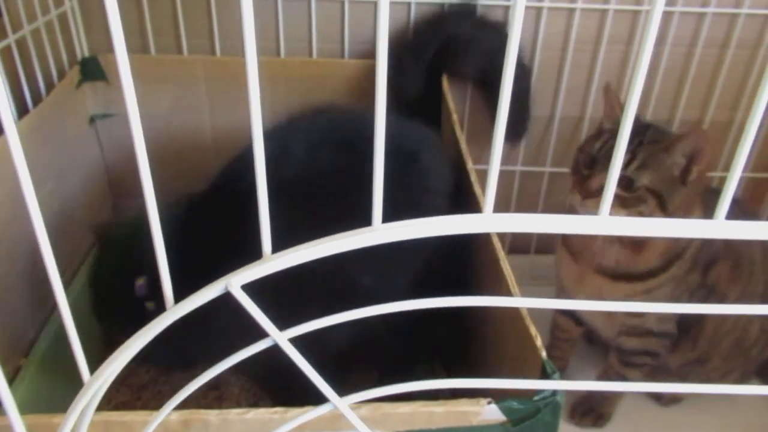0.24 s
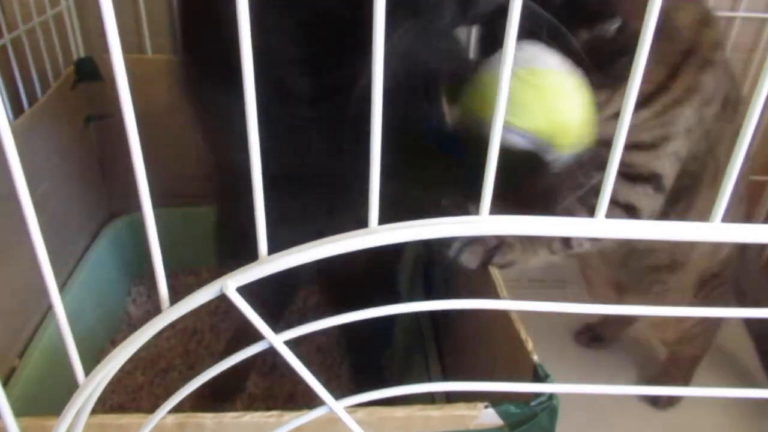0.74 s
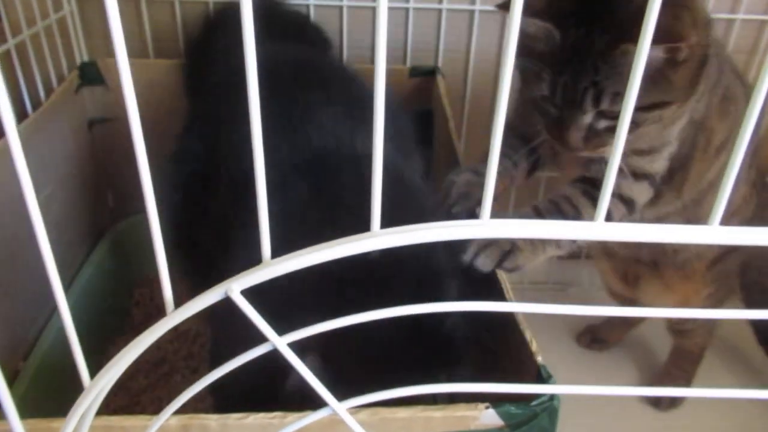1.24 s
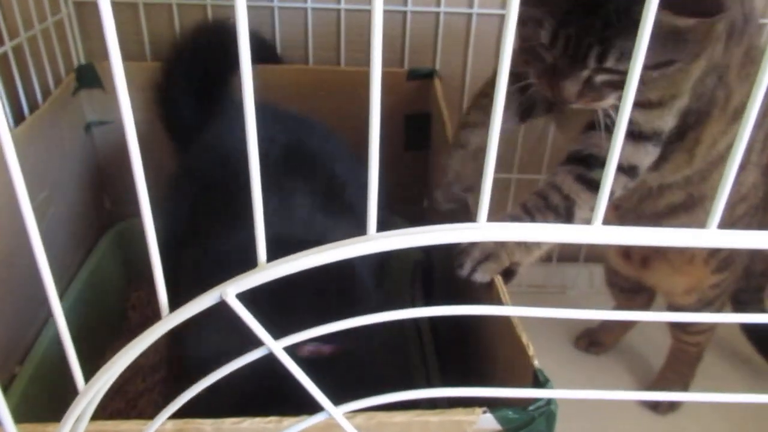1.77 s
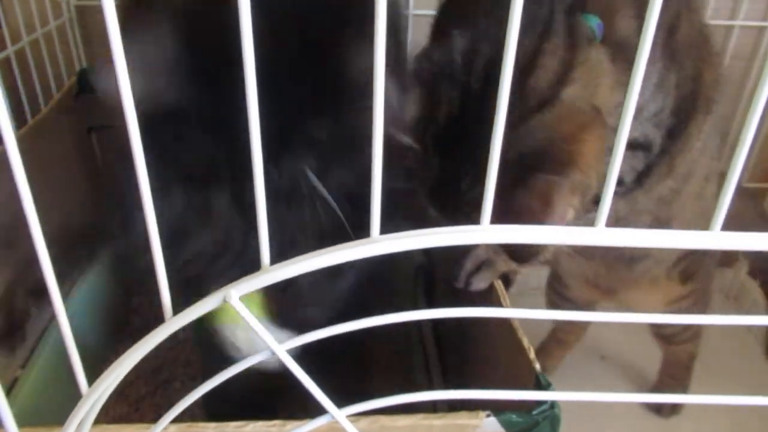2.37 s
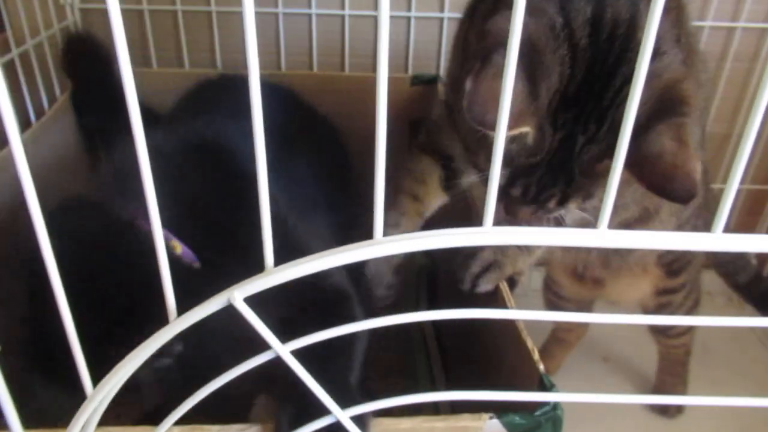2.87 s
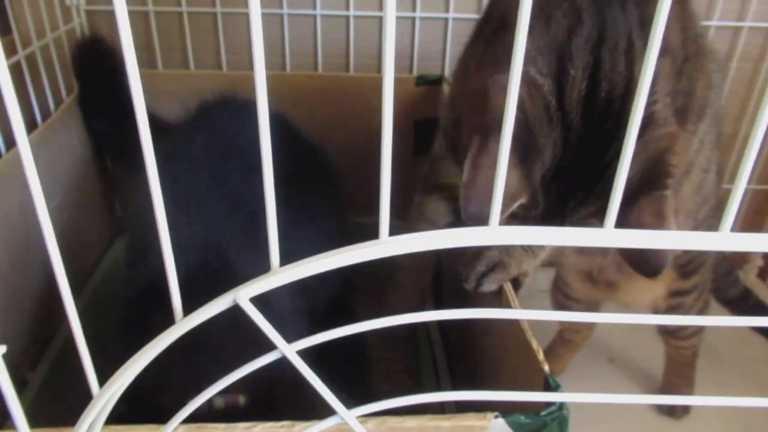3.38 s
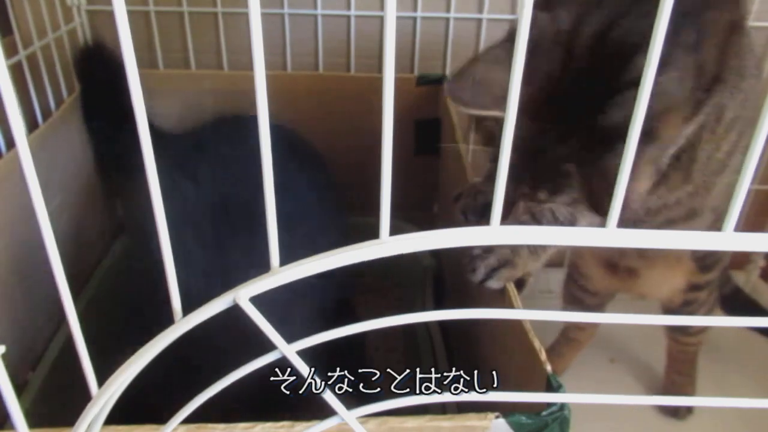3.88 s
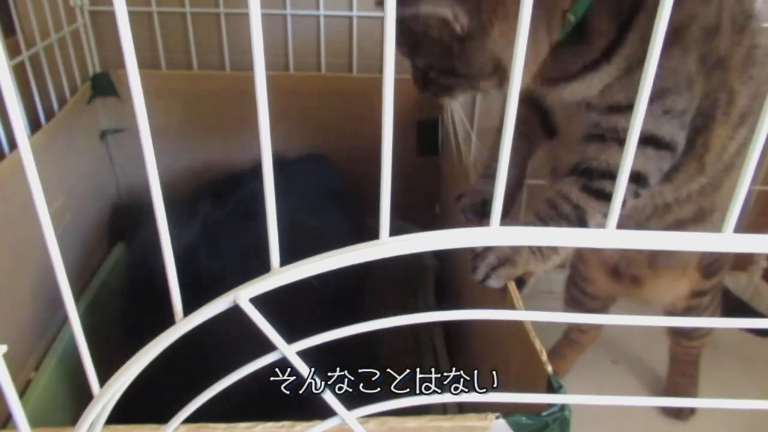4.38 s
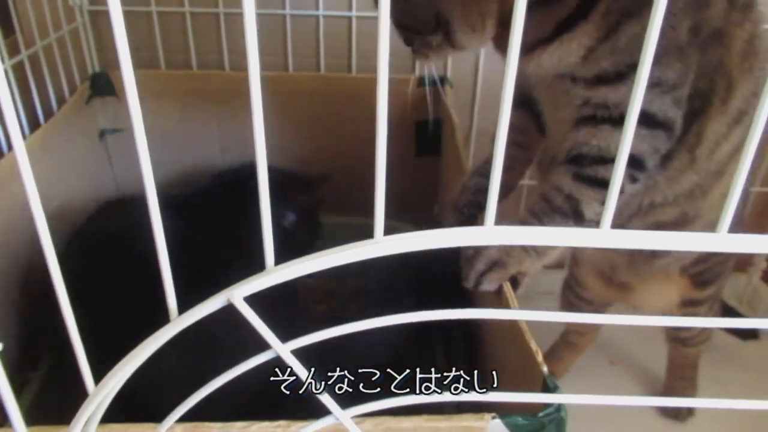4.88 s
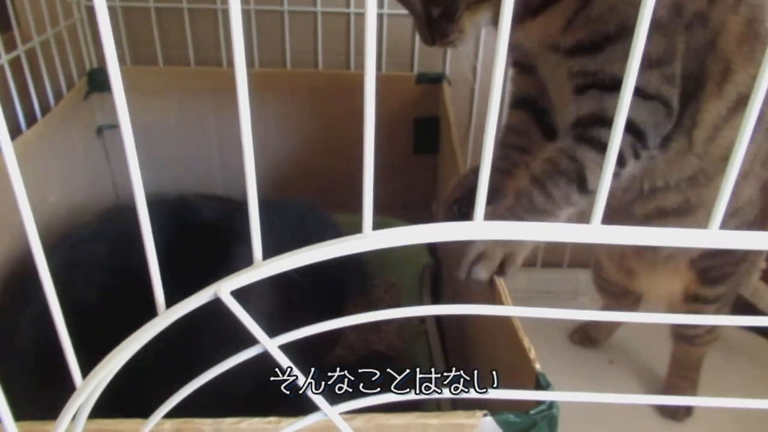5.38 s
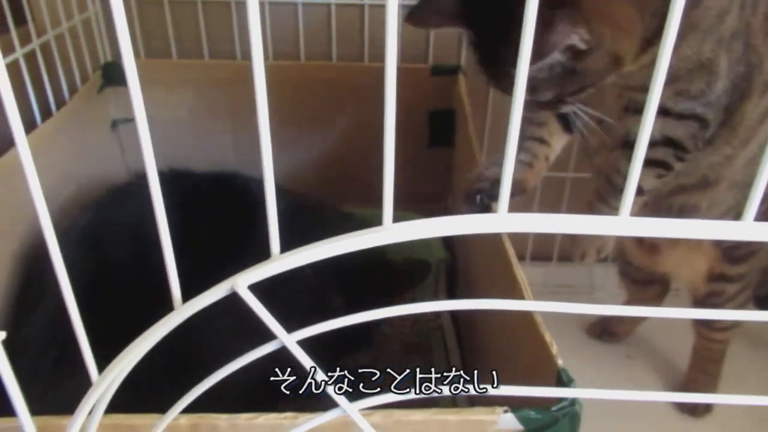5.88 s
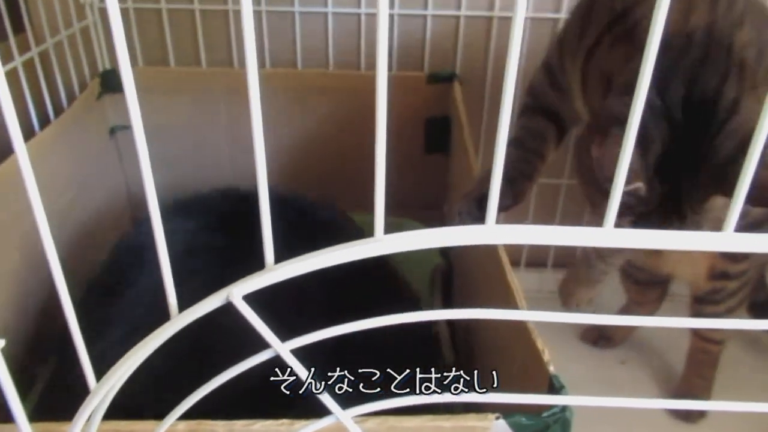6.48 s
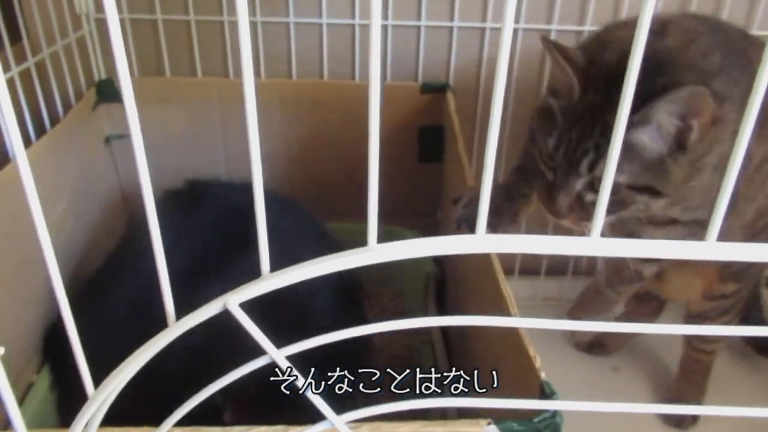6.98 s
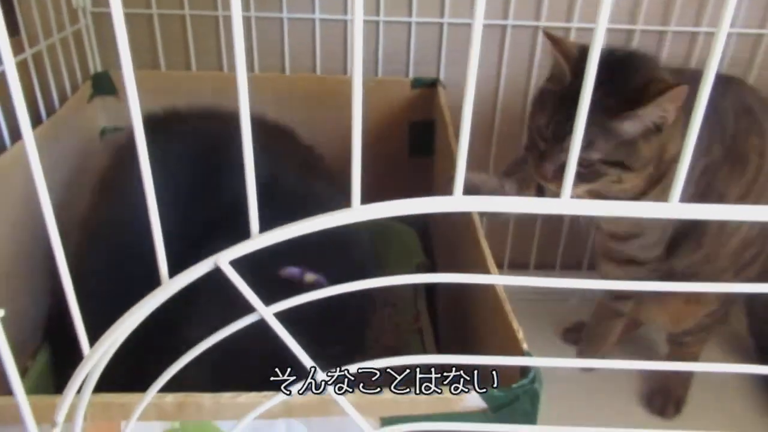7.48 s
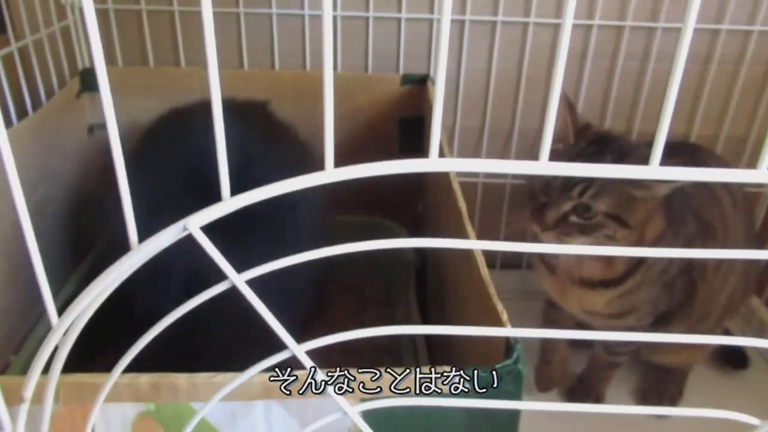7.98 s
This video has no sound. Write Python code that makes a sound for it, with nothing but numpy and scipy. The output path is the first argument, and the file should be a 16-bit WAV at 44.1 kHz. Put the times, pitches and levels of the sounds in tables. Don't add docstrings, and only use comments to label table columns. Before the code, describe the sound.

A kitten digs in wood pellets in a plastic tray, sharp crunchy cracks and rustling bursts between quiet pauses of room hiss.

```python
import sys
import numpy as np
from scipy import signal
from scipy.fft import rfft, irfft, next_fast_len
from scipy.io import wavfile
from scipy.ndimage import uniform_filter1d

SR = 44100
rng = np.random.default_rng(int(sys.argv[2]) if len(sys.argv) > 2 else 0)


def level_to_linear(level):
    exponent = np.asarray(level, float) / 20
    return 10 ** exponent


def bounce(signal):
    frames = np.transpose(np.atleast_2d(signal))
    limited = np.clip(frames, -1, 1)
    pcm = np.round(limited * 32767).astype(np.int16)
    wavfile.write(sys.argv[1], SR, pcm)


N = 363384


def evened(x):
    return x / np.sqrt(np.mean(x ** 2) + 1e-20)


def read(points, hz):
    f, value = np.transpose(points)
    return np.interp(np.log(hz + 1), np.log(f + 1), value)


def add(mix, s, sound):
    part = mix[round(s * SR):][:len(sound)]
    part += sound[:len(part)]


def colour(x, points):
    size = next_fast_len(len(x))
    gain = level_to_linear(read(points, np.fft.rfftfreq(size, 1 / SR)))
    return irfft(rfft(x, size) * gain, size)[:len(x)]


def resonate(x, hz, width_hz):
    turn = np.exp(2j * np.pi * np.cumsum(hz * np.ones(len(x))) / SR)
    r = np.exp(-np.pi * width_hz / SR)
    return 2 * (turn * signal.lfilter([1 - r], [1, -r], x / turn)).real


def band(x, lo_hz, hi_hz):
    y = signal.sosfilt(signal.butter(2, [lo_hz, hi_hz], "band", fs=SR, output="sos"), x)
    return y / np.abs(y).max()


def clicks(per_s, spread_db):
    size = level_to_linear(spread_db * np.minimum(rng.exponential(1, N), 4)) * rng.choice([-1., 1.], N)
    return evened(size * (rng.random(N) < per_s / SR))


def room_hiss():
    # hz, level_db_per_hz
    air_spectrum = [(13, -43), (22, -25), (84, -6.5), (138, -9.5), (168, -17.5), (282, -8), (382, -14),
                    (438, -12), (475, -17.5), (1420, -21), (1770, -20.5), (2270, -28), (10800, -35.5),
                    (15500, -41.5)]
    level_db = -54
    frames, hz = N // 512 + 5, np.fft.rfftfreq(2048, 1 / SR)
    a, b, patches = rng.standard_normal((frames, 1025, 3)).T
    patches_db = evened(uniform_filter1d(uniform_filter1d(patches, 20, 0), 8, 1))
    z = (a + 1j * b) * level_to_linear(read(air_spectrum, hz)[:, None] + patches_db)
    return level_to_linear(level_db) * evened(signal.istft(z, nperseg=2048, noverlap=1536)[1][:N])


def hum():
    # time_s, pitch_hz, level_db, half_tone_db
    hum_track = [(0, 89.2, -74.5, -64), (2.75, 85.9, -59, -65), (3.35, 80, -56.5, -64),
                 (3.85, 68.7, -56, -69), (4.199, 83.5, -81, -78), (5.6, 84.6, -69, -59.5),
                 (5.899, 83.5, -58.5, -59), (6.5, 87.3, -55, -62), (6.9, 83.8, -59, -70),
                 (7.498, 83.5, -57.5, -62), (8.24, 87, -70, -66)]
    s, *columns = np.transpose(hum_track)
    hum_hz, hum_db, half_db = (np.interp(np.arange(N) / SR, s, c) for c in columns)
    waver = evened(uniform_filter1d(uniform_filter1d(rng.standard_normal(N), size=4000), size=4000))
    phase = 2 * np.pi * np.cumsum(hum_hz + 1.2 * waver) / SR
    tone = np.sqrt(2) * level_to_linear(hum_db + 0.68 * waver) * np.sin(phase)
    half = resonate(resonate(rng.standard_normal(N), hum_hz / 2, 7.3), hum_hz / 2, 7.8)
    whine = level_to_linear(-73) * evened(resonate(rng.standard_normal(N), 1800, 12))
    return tone + level_to_linear(half_db) * evened(half) + whine


def squeaks():
    # start_s, length_s, top_hz, end_droop_hz, level_db
    whistles = [
        (.235, .2, 13450, 1900, -76),
        (2.6, .18, 13100, 1700, -76),
        (6.37, .12, 13600, 1100, -77),
        (6.485, .075, 13350, 700, -78),
    ]
    lean = .75
    out = np.zeros(N)
    for s, length_s, top_hz, droop_hz, db in whistles:
        arch = np.sin(np.pi * np.linspace(0, 1, int(length_s * SR)) ** lean)
        hz = top_hz - droop_hz * (1 - arch)
        tone = np.sin(2 * np.pi * np.cumsum(hz) / SR)
        add(out, s, np.sqrt(2) * level_to_linear(db) * np.sqrt(abs(arch)) * tone)
    return out


def swishes():
    # start_s, length_s, level_db
    brushes = [(1.455, 0.067, -59.5), (1.568, 0.079, -53), (7.63, 0.096, -59), (2.07, 0.18, -58.5),
               (3.857, 0.25, -57.5), (5.32, 0.089, -62), (5.69, 0.23, -61), (7.517, 0.076, -58.5),
               (8.102, 0.083, -53)]
    level, hiss = np.zeros(N), evened(band(rng.standard_normal(N), 2300, 11800))
    for s, length_s, db in brushes:
        add(level, s, level_to_linear(db) * np.hanning(int(length_s * SR)))
    return level * hiss


def struck_wall(blows):
    puff_hz = 900
    out, t = np.zeros(N), np.arange(12000) / SR
    draws = rng.standard_normal((len(blows), len(t)))
    for (s, db, hz, t60_s), noise in zip(blows, draws):
        shape = level_to_linear(-60 * t / max(t60_s, .02)) * np.minimum(t * hz / 0.44, 1)
        swing = np.sin(2 * np.pi * hz * t) * shape
        puff = np.clip(hz / puff_hz, .3, 1.1) * band(noise * shape, 0.69 * hz, 2.36 * hz)
        add(out, s, level_to_linear(db + 2.5) * (swing + puff))
    return out


def thumps():
    # start_s, peak_db, pitch_hz, t60_s
    paw_thumps = [(0.24, -36, 155, 0.03), (0.662, -34, 65.5, 0.11), (0.673, -34.5, 287, 0.097),
                  (0.804, -25.5, 214, 0.033), (0.841, -39, 89.5, 0.15), (.845, -29.5, 230, 0.053),
                  (1.502, -29.5, 78, 0.075), (.53, -36.5, 300, .04), (.755, -36, 250, .05),
                  (4.82, -37, 324, 0.069), (4.68, -40, 278, 0.059), (1.616, -41.5, 287, 0.18),
                  (2.087, -37.5, 392, 0.12), (2.088, -39.5, 697, 0.11), (2.217, -42, 413, 0.039),
                  (2.29, -40, 388, 0.025), (2.115, -33, 84, 0.097), (2.509, -27, 458, 0.047),
                  (2.516, -20, 59.6, 0.05), (2.537, -34, 41, 0.3), (2.62, -26.5, 151, 0.064),
                  (2.66, -38, 72, 0.18), (2.633, -40, 45, 0.13), (3.179, -33.5, 300, 0.046),
                  (4.035, -24, 96, 0.11), (4.211, -47, 44.5, 0.19), (4.737, -33.5, 113, 0.044),
                  (5.326, -44.5, 146, 0.086), (5.332, -41, 532, 0.072), (6.792, -45.5, 246.4, 0.42),
                  (6.85, -42.5, 292, 0.2), (7.95, -42.5, 263, 0.16)]
    return struck_wall(paw_thumps)


def knocks():
    # start_s, peak_db, pitch_hz, t60_s
    tray_knocks = [(3.199, -33.5, 950, 0.039), (3.197, -31, 472, 0.057), (4.96, -27.5, 560, 0.08),
                   (.701, -32, 4300, 0.017), (2.67, -35, 290, 0.086), (4.093, -12.5, 910, 0.017),
                   (4.23, -31.5, 283, 0.096), (4.2725, -15, 665, 0.033), (1.621, -25.5, 2350, 0.054),
                   (4.822, -27.5, 2280, 0.032), (6.9, -34, 876, 0.029), (.7, -25, 1340, .03),
                   (.927, -31, 1450, .04), (.93, -39, 2580, .03), (.862, -32, 2470, 0.034),
                   (1.621, -28.5, 1200, 0.029), (2.684, -37, 2500, .02), (2.712, -40, 2500, .02),
                   (2.91, -29.5, 1290, 0.031), (4.729, -32, 1350, 0.031), (4.823, -26.5, 800, 0.054),
                   (4.212, -26, 1260, .04), (0.48, -46, 1080, 0.046), (2.617, -36, 1130, .03),
                   (.812, -27, 1570, .04), (0.91, -33, 3100, .02), (2.615, -34, 4000, 0.022),
                   (4.04, -35.5, 277, 0.086), (2.512, -31, 286, 0.062)]
    return struck_wall(tray_knocks)


def rustle():
    # time_s, level_db
    stir = [(0.0, -52), (0.6, -49), (0.8, -37.5), (1.05, -47.5), (1.99, -61), (2.81, -47), (3.29, -59),
            (4.0, -51.5), (4.23, -38.5), (4.95, -44.5), (5.17, -56), (5.78, -55), (6.41, -54), (6.73, -47),
            (7.0, -57.5), (7.62, -49), (7.87, -41.5), (8.22, -46.5)]
    # start_s, length_s, tray_body_db, grit_rel_db
    scrapes = [(3.966, 0.12, -49.5, -16), (5.708, 0.14, -58, -6), (7.896, 0.065, -52, -29),
               (8.139, 0.034, -48.5, -8), (0.148, 0.057, -38, -16), (0.228, 0.035, -41, -30),
               (0.424, 0.043, -55, -24), (0.577, 0.028, -45, -30), (0.601, 0.035, -40.5, -28),
               (0.65, 0.046, -45.5, -10), (0.804, 0.071, -36.5, -19), (2.666, 0.067, -37, -24),
               (3.155, 0.071, -46.5, 1), (4.952, 0.025, -45, -3), (4.102, 0.021, -39, 12),
               (7.962, 0.12, -59.5, -4), (5.5, 0.014, -37.5, -28), (6.494, 0.064, -43, -13),
               (6.825, 0.11, -39, -14.5), (7.716, 0.097, -38.5, -12.5), (7.946, 0.018, -33, -6),
               (4.061, 0.067, -38, -14), (4.147, 0.047, -49, -10), (4.21, 0.072, -37, -16),
               (4.3, 0.044, -47, -10), (4.367, 0.098, -46, -10), (4.47, 0.078, -51.5, -14),
               (4.557, 0.084, -44.5, -12), (4.661, 0.035, -44, -18), (4.712, .07, -45, -15),
               (4.823, 0.065, -43, -14), (4.966, 0.082, -43, -14), (5.078, 0.038, -47, -16),
               (6.582, 0.038, -44, -13), (6.656, 0.027, -44, -13), (8.17, 0.066, -39, -18)]
    # hz, level_db_per_hz
    body_spectrum = [(200, -5), (480, -4), (600, 3.5), (1270, -5.5), (2500, -12), (4000, -25), (8000, -50)]
    # hz, level_db
    grit_spectrum = [(1200, -40), (2500, 10), (4000, -2.5), (7000, 1.5), (11000, -8), (15000, -16)]
    # pitch_hz, width_hz, level_db
    tray_modes = [(660, 30, -9), (875, 38, 16.5), (1156, 60, 24), (1650, 140, 30.5), (2480, 520, -17),
                  (3270, 98, 19)]
    grit_rest_db, grit_knee_db, grit_rise = -62.5, -43, 3
    stir_db = np.interp(np.arange(N) / SR, *np.transpose(stir))
    grit_db = grit_rest_db + grit_rise * np.maximum(stir_db - grit_knee_db, 0)
    body_level, grit_level = level_to_linear(stir_db - 5.5), level_to_linear(grit_db - 4.5)
    for s, length_s, db, rel_db in scrapes:
        stroke = np.sin(np.linspace(0, np.pi, int(length_s * SR))) ** 0.79
        add(body_level, s, level_to_linear(db) * stroke)
        add(grit_level, s, level_to_linear(db + rel_db) * stroke ** 2)
    taps = clicks(1800, 2.0)
    rings = np.zeros(N)
    for k, (hz, width_hz, db) in enumerate(tray_modes):
        rings += (-1) ** k * level_to_linear(db) * resonate(taps, hz, width_hz)
    body = evened(evened(colour(taps, body_spectrum)) + 0.39 * evened(rings))
    grit = evened(colour(clicks(1500, 2.4), grit_spectrum))
    return body_level * body + grit_level * grit


def cracks():
    # start_s, peak_db, tray_body_rel_db, sparkle_rel_db
    step_cracks = [(0.0828, -42, 0, -53), (0.1465, -26.5, 0, -7), (0.1744, -34.5, 3, -21),
                   (0.2017, -23, -5.5, -39), (0.218, -39, 0, -45), (0.238, -35.5, 4, -36),
                   (0.4403, -51.5, 14, -7), (0.5907, -48.5, 7, -12), (0.6997, -21.5, -49, -12),
                   (0.712, -29, -12, -41), (0.8054, -36, -4, -40), (0.8099, -19, -9, -14),
                   (0.8229, -22, -23, -31), (0.8374, -27, -11, -17), (0.8612, -15, -42, -10.5),
                   (0.9255, -18.5, -39, -24), (0.9333, -20.5, -29, -28), (1.6202, -13, -12.5, -12),
                   (1.641, -25, -13, -28), (2.5086, -21, -1.5, -4), (2.5305, -26, -6, -11),
                   (2.614, -23.5, -2.5, -8), (2.6694, -40, -12, -20), (2.684, -41, -12, -20),
                   (2.7112, -40, -6, -29), (2.7591, -38, 3.5, -10.5), (2.771, -39.5, 2, -10),
                   (2.9019, -32, -10, -16), (2.9098, -22, -7.5, -8), (3.1992, -35, 10.5, -2.5)]
    dig_cracks = [(3.8394, -48, -10, -0.5), (4.0397, -30.5, 2.5, -22), (4.0557, -12.5, -7.5, -6),
                  (4.0694, -18.5, -1, -20), (4.0826, -9.5, -5, -18), (4.0926, -6.5, -8, -14),
                  (4.107, -19, -8, -8), (4.1485, -24, -29, -19), (4.1564, -20, -20, -14),
                  (4.2108, -16.5, 3, -16), (4.2278, -8.5, -5.5, -8), (4.2544, -22, -6, 1.5),
                  (4.2722, -9.5, -10.5, -13), (4.2904, -41, -8, -27), (4.3066, -23, -16, -28),
                  (4.3174, -24.5, -2.5, -9), (4.3294, -25, -4.5, -14), (4.364, -21, -13, -12),
                  (4.3684, -22, -12, -5.5), (4.3834, -21, -6.5, -26), (4.4004, -27.5, -34, -19),
                  (4.4134, -25, -12, -13), (4.4354, -26, -7, -9), (4.4564, -34.5, 4.5, -23),
                  (4.4834, -35, -13, -12), (4.4994, -29, -22, -12), (4.5154, -35.5, -16, -4)]
    rake_cracks = [(4.56, -13, -19, -10), (4.5775, -18, -13, -19), (4.5884, -22, -11, -16),
                   (4.5984, -18, -11.5, -23), (4.6103, -21.5, -7, -18), (4.6206, -15, -35, -21),
                   (4.6347, -32, 2, -16), (4.6618, -30, 2, -23), (4.674, -31.5, 3, -33),
                   (4.707, -20.5, -14, -11), (4.728, -21.5, -4, -31), (4.7564, -27.5, -6, -26),
                   (4.8219, -18.5, -3, -35), (4.8573, -19.5, -10, -24), (4.896, -37, -4, -20),
                   (4.9566, -15.5, -6.5, -40), (4.9814, -11.5, -9, -18), (4.996, -34, -1, -32),
                   (5.0077, -26.5, -3, -2.5), (5.031, -19, -6.5, -14), (5.079, -20.5, -7, -20.5),
                   (5.091, -36, 4.5, -30), (5.1272, -31, -4, -12), (5.144, -25.5, -7, -12.5)]
    settle_cracks = [(5.416, -36, -4, -13.5), (5.506, -29, -3.5, -33), (5.774, -42, -10, -6.5),
                     (6.0342, -43, -2, -15), (6.5251, -32, -7, -11), (6.5874, -25.5, -3.5, -7.5),
                     (6.5915, -25, -3.5, -17), (6.6194, -31, -6.5, -27), (6.656, -30, -1, -15),
                     (6.664, -29, -17, -19), (6.6977, -34, -17, -6), (6.8487, -31.5, -7, -7.5),
                     (6.881, -25.5, -1.5, -35), (7.6994, -27.5, -9, -9.5), (7.7318, -31, -2, -19),
                     (7.7477, -30, -11, -20), (7.767, -27, -18, -22), (7.7794, -26, -12, -13.5),
                     (7.86, -29, -14, -15), (7.9538, -16, -4, -22), (8.1538, -25.5, -11, -19),
                     (8.1705, -23.5, 1, -23), (8.1864, -11.5, -6, -12.5), (8.198, -35, 5, -31),
                     (8.2085, -26, 4.5, -25), (8.22, -22.5, 1, -20), (8.2324, -9.5, -6.5, -3),
                     (8.2364, 0, -15, -34.5)]
    stray_cracks = [(0.155, -27, -2, -9), (0.287, -47.5, 8, -18), (0.5207, -47, -4, -9),
                    (0.612, -43, 1, -19), (0.6589, -38, -1, -6.5), (0.7642, -37, -15, -8),
                    (0.784, -36, 0.5, -5.5), (0.8724, -23.5, -10, -10), (0.9594, -33.5, -11, -13),
                    (1.472, -39.5, -4.5, -14), (2.0635, -46, -3, -16), (2.2184, -45.5, -5, -5.5),
                    (2.7935, -40, 3, -12), (3.1802, -31, -2.5, -12), (4.1747, -33, 6.5, -8),
                    (4.2364, -24, -3, -9), (4.2613, -13.5, -7.5, -18), (4.7947, -38, 4.5, -8),
                    (4.869, -31, -10, -10), (4.9344, -34, -7, -16), (4.9604, -18.5, -8, -19),
                    (5.3507, -45.5, -10, -7), (6.5066, -35, -10, -15), (6.562, -35, -2.5, -13),
                    (6.647, -32, -7, -15), (6.8267, -43, -14, -21), (6.8354, -37.5, -4, -18),
                    (6.8974, -26, -3, -30), (6.9104, -36, -5, -17), (7.658, -33, -6, -15),
                    (7.9184, -42.5, 10, -6), (8.1759, -13, -10, -17.5)]
    snap_hz, snap_hz_per_db, snap_spread = 2672, 35.5, .07
    first_t60_s, first_share, rise_s = .012, 2.2, .001
    swarm_t60_s, swarm_spread_db = 0.061, 2.5
    lump_db, grain_db = 2.2, 4.0
    ring_spread_db, ring_width_hz = 2.5, 284
    sparkle_t60_s = 0.084
    crack_gain_db, body_gain_db, sparkle_gain_db = -1, 3.5, 5.5

    out, t = np.zeros(N), np.arange(5000) / SR
    rows = step_cracks + dig_cracks + rake_cracks + settle_cracks + stray_cracks
    draws = rng.standard_normal((len(rows), 2, len(t)))
    for (s, db, body_db, sparkle_db), (noise, lumps) in zip(rows, draws):
        hz = max(snap_hz + snap_hz_per_db * (sparkle_db - body_db / 2), 1200) * (1 + snap_spread * noise[-1])
        t60_s = swarm_t60_s * level_to_linear(swarm_spread_db * lumps[-1])

        swarm_db = lump_db * evened(uniform_filter1d(lumps, size=40)) + grain_db * abs(lumps[::-1])
        swarm = evened(noise * level_to_linear(swarm_db)) * level_to_linear(-60 * t / max(t60_s, .01))
        first = first_share * noise * level_to_linear(-60 * t / first_t60_s)
        burst = (swarm + first) * np.minimum(t / rise_s, 1)

        rings = sum(resonate(burst, hz * level_to_linear(ring_spread_db * n), ring_width_hz) for n in noise[-4:-1])
        snap = band(band(burst + rings, 0.19 * hz, 2.08 * hz), 0.46 * hz, 3.53 * hz)

        body = band(burst * np.minimum(t / 0.004, 1), 588, 1470)

        sparkle_lumps = np.roll(evened(uniform_filter1d(lumps, size=60)), 999)
        sparkle = band(burst * level_to_linear(lump_db * sparkle_lumps - 60 * t / sparkle_t60_s), 3160, 10000)
        sparkle = signal.lfilter([1], [1, -.45], sparkle)

        crack = snap + level_to_linear(body_db + body_gain_db) * body + level_to_linear(sparkle_db + sparkle_gain_db) * sparkle
        add(out, s, level_to_linear(db + crack_gain_db) * crack)
    return out


def cage(x):
    # hz, t60_s
    decay = [(300, 0.64), (700, 0.2), (2000, 0.21), (6000, 0.12), (14000, 0.28)]
    taps = np.zeros(SR // 2)
    at = np.arange(100, len(taps) - 20, 20)
    taps[at + rng.integers(0, 20, len(at))] = rng.choice([-1., 1.], len(at))
    hz, t, z = signal.stft(taps, SR, nperseg=128)
    tail = signal.istft(z * level_to_linear(-60 * t / read(decay, hz)[:, None]), SR, nperseg=128)[1]
    return signal.fftconvolve(x, tail / np.linalg.norm(tail))[:N]


def scene():
    near = swishes() + thumps() + knocks() + rustle() + cracks()
    room = room_hiss() + hum()
    return (near + level_to_linear(-10.0) * cage(near) + room + squeaks())[None]


def top_cut(x):
    return signal.sosfilt(signal.butter(12, 16010, fs=SR, output="sos"), x)


def record(dry):
    ceiling, edge_hz = .75, 14980
    edge = signal.firwin(255, edge_hz, window=("kaiser", 4), fs=SR)
    thinned = signal.sosfilt(signal.butter(N=2, Wn=30, btype="high", fs=SR, output="sos"), dry)
    limited = ceiling * np.tanh(thinned / ceiling)
    mix = signal.oaconvolve(limited, edge[None], "same")
    return top_cut(mix)


dry = scene()
out = record(dry)
bounce(out)
```